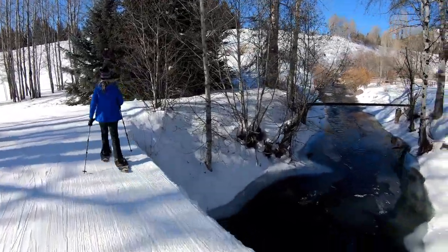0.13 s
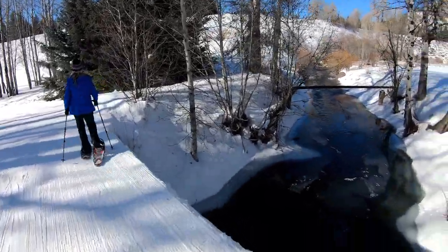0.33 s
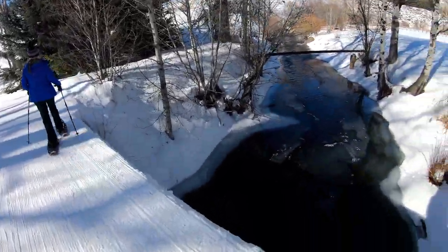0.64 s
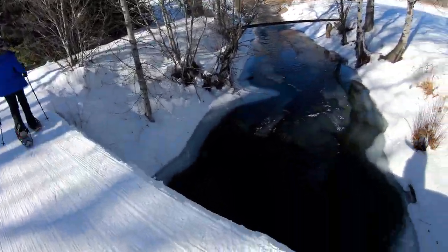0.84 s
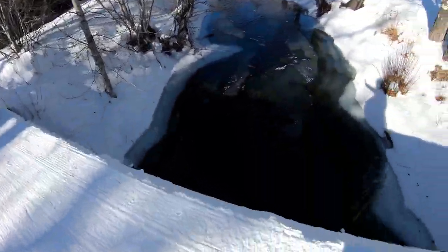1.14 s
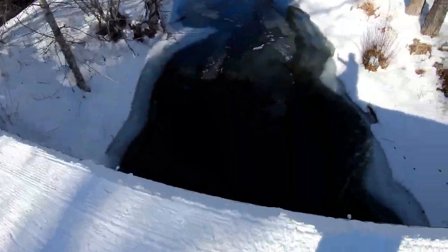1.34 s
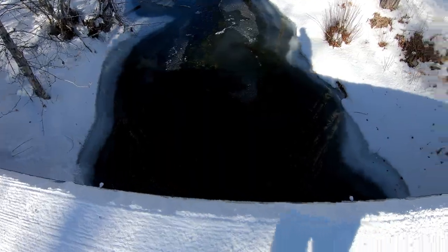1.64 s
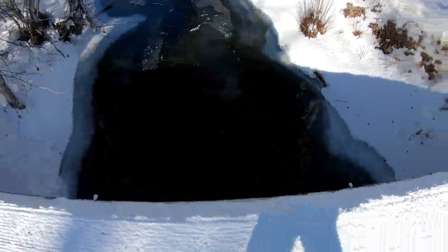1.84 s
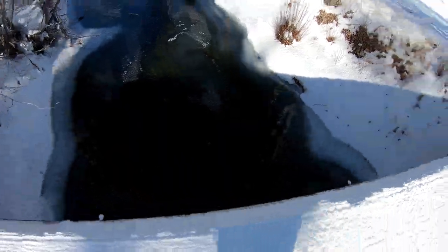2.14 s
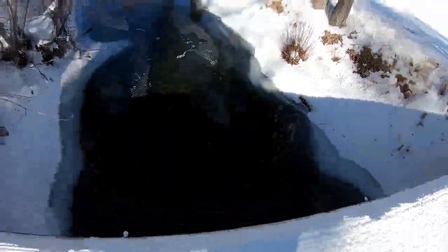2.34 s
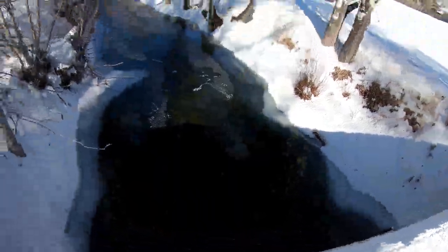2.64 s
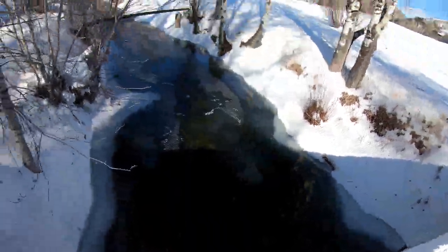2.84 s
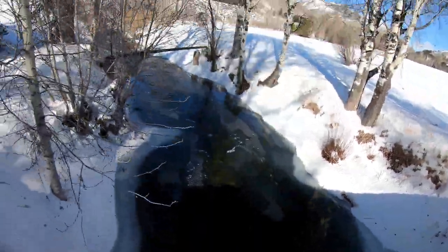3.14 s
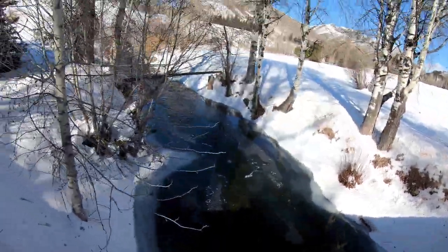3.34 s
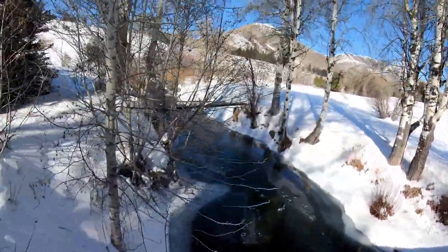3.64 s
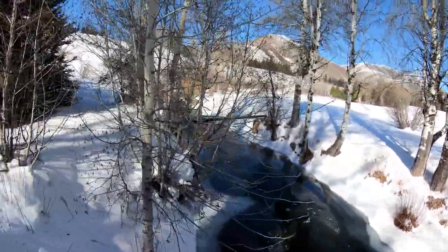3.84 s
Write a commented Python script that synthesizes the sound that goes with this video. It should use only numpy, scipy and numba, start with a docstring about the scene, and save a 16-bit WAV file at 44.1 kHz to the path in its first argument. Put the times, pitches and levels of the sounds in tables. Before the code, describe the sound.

Steady snowshoe footsteps break crisp crust in sharp cracks and grainy crushing, with sliding crystals and dull thumps. Heard close from chest height on an open winter trail, over faint hush and late low gusts.

```python
"""Snowshoes on firm snow

Snowshoe steps on firm snow, heard from a hand-held camera at chest height, a little from the right.
The crust cracks in short bursts of damped rings, and grains crush as thousands of smaller rings.
Loose crystals hiss, as shaped noise, while they slide and spray; slaps, thuds and creaks fall between.
Low noise makes gusts that rumble on the two microphone ports over a faint winter hush."""
import sys
import numpy as np
from scipy import signal
from scipy.fft import rfft, irfft
from scipy.io import wavfile
from scipy.ndimage import uniform_filter1d
from numba import njit

SR = 44100
rng = np.random.default_rng(int(sys.argv[2]) if len(sys.argv) > 2 else 0)


def transcribe(signal):
    """Save signal, clipped to [-1, 1], as a 16-bit WAV file at the path in sys.argv[1]."""
    frames = np.atleast_2d(signal).T
    limited = np.clip(frames, -1, 1)
    pcm = np.round(limited * 32767).astype(np.int16)
    wavfile.write(sys.argv[1], SR, pcm)


N = 176400  # samples, 4 s

# how strongly snow sounds at each pitch: pitch_hz [Hz], relative level_db [dB]
SNOW_COLOUR = [(90, -29.5), (170, -9), (670, -4), (1300, 4.5), (1900, 6.5), (3200, -1.5), (5000, -54)]

# a Q is the sharpness of a damped ring: it falls to 1/e in Q / pi cycles
CRACK_Q, THUD_Q, RING_Q = 2.51, 1.47, 7.7
THUD_HZ, FRACTURE_HZ = 203, 2530  # dull thump; hard, bright first fracture
RING_LAG_S = 0.00185  # the plate rings this long after the crack
SPRAY_DB, SPRAY_S = -28.5, 0.0051  # thrown crystals: level against their crack, decay time
GRAIN_SCATTER_DB, CLUMP_DB = 2, 2.5  # spread of grain levels; depth of the clumping


def undb(db):
    """Gain of a dB value."""
    return 10 ** (np.asarray(db) / 20)


def on_hz(table, hz):
    """Read (Hz, value) points on a log frequency axis."""
    points = np.array(table)
    return np.interp(np.log(np.maximum(hz, 1)), np.log(points[:, 0]), points[:, 1])


def on_time(table, column=1):
    """Read one column of rows that begin with a time in s, at every sample."""
    rows = np.array(table)
    return np.interp(np.arange(N) / SR, rows[:, 0], rows[:, column])


def at(s):
    """Sample index of a time in s."""
    return (s * SR).astype(np.int64)


def unit(x):
    """Scale to rms 1."""
    return x / np.sqrt(np.mean(x ** 2))


def noise(table):
    """Noise coloured by (Hz, dB) points, rms 1."""
    spectrum = rfft(rng.standard_normal(N))
    return unit(irfft(spectrum * undb(on_hz(table, np.fft.rfftfreq(N, 1 / SR))), N))


def walk(rate):
    """Random levels held 1 / rate s and slewed, rms 1."""
    hold = max(int(SR / rate), 2)
    levels = rng.standard_normal(4000)
    return unit(uniform_filter1d(levels[np.arange(N) // hold % len(levels)], hold // 2 + 1))


@njit
def grains(n, start, turn, q, size):
    """Each grain is a short damped ring with a soft onset; turn is its pitch in radians per sample."""
    out = np.zeros(n)
    for g in range(len(start)):
        spin = np.exp(1j * turn[g] - turn[g] / (2 * q[g]))
        fade = np.exp(-turn[g] / 2)
        z, softness = size[g] + 0j, 1.
        for i in range(max(start[g], 0), min(n, start[g] + int(12 * q[g] / turn[g]))):
            out[i] += z.imag * (1 - softness)
            z, softness = z * spin, softness * fade
    return out


def ring(s, hz, q, size):
    """Damped rings from times [s], pitches [Hz], sharpnesses and sizes."""
    turn = 2 * np.pi * np.clip(hz, 40, SR / 3) / SR
    return grains(N, at(s), turn, q + 0 * s, size)


def kicked(s, db, decay_s):
    """Sudden rises at the given times that die away exponentially."""
    kicks = np.bincount(at(s), undb(db), N)
    return signal.lfilter([1], [1, -np.exp(-1 / (decay_s * SR))], kicks)


def snowshoes(clumps):
    """Cracks and crush ring within the band of the snow; loose crystals hiss as they slide and spray."""
    # one list per step: time_s [s], relative crush_db [dB], relative slide_db [dB]
    step_rows = [
        [(.05, -54, -64.5), (.19, -49, -77), (.235, -43.5, -61), (.32, -39, -49.5), (.42, -33.5, -51),
         (.455, -45, -72), (.47, -54, -67.5)],
        [(.61, -62.5, -66), (.665, -55, -53.5), (.705, -65, -60), (.755, -40.5, -54.5), (.80, -45.5, -51),
         (.88, -37.5, -47.5), (.97, -36.5, -53.5), (.99, -48, -58), (1.07, -61, -62.5)],
        [(1.19, -58.5, -66), (1.24, -50, -55.5), (1.34, -43, -62.5), (1.355, -40.5, -45.5), (1.42, -39, -46),
         (1.46, -34.5, -46), (1.52, -44, -50), (1.54, -63, -57), (1.58, -57, -65.5)],
        [(1.72, -57.5, -65), (1.8, -47.5, -66.5), (1.83, -48, -49), (1.95, -47.5, -51), (1.99, -38.5, -48.5),
         (2.035, -35.5, -50.5), (2.08, -40.5, -48.5), (2.11, -66, -54), (2.17, -63, -62)],
        [(2.28, -66, -68), (2.32, -50.5, -60), (2.385, -52, -60), (2.4, -45, -47), (2.51, -45.5, -50),
         (2.53, -36, -43), (2.6, -32.5, -51.5), (2.62, -52, -51.5), (2.71, -61.5, -68.5)],
        [(2.83, -50.5, -68.5), (2.9, -55, -53.5), (2.93, -40.5, -51), (3.02, -45, -52), (3.04, -36.5, -53),
         (3.11, -38, -52.5), (3.13, -48.5, -59), (3.26, -64, -72.5)],
        [(3.39, -48.5, -86), (3.45, -49.5, -80), (3.47, -39.5, -54), (3.53, -46, -50.5), (3.545, -33, -47.5),
         (3.63, -35, -56.5), (3.685, -40.5, -60), (3.7, -55.5, -75)],
        [(3.83, -56, -72), (3.87, -51, -73), (3.94, -54.5, -60.5), (4.0, -35, -48.5)],
    ]
    # spectrum of the sliding hiss: freq_hz [Hz], relative level_db [dB]
    slide_colour = [(2000, -13), (3500, -15), (4600, -23), (8500, -20.5), (10100, -29), (11500, -45),
                    (14000, -46), (15500, -65)]
    rows = [row for step in step_rows for row in step]
    knocks, spray = np.sum([cracks(), snaps(), slaps()], axis=0)
    load = knocks + thuds() + creaks() + crush(rows, clumps)
    body = signal.sosfilt(signal.butter(4, (84, 7400), "band", fs=SR, output="sos"), load)

    flicker_db = 3 * (0.49 * clumps + walk(300))
    slide = undb(on_time(rows, column=2) + 9.5 + flicker_db)

    # the hollow under the crust hums after every load
    hollow_hz, hollow_width_hz, hollow_db = 168.7, 33.5, -0.5
    peak = signal.iirpeak(hollow_hz, hollow_hz / hollow_width_hz, SR)
    hollow = signal.lfilter(*peak, body) * undb(hollow_db)
    return body + hollow + noise(slide_colour) * (slide + spray)


def cracks(count=16):
    """A crack is a burst of fractures that sinks in pitch, a ring of the plate and a spray of crystals."""
    # cracks of the crust: start_s [s], relative level_db [dB], plate pitch_hz [Hz]
    crust_cracks = [(.105, -15.5, 720), (.128, -9.5, 705), (.159, -13.5, 900), (.194, -21, 765),
                    (.199, -10, 910), (0.214, -13.5, 820), (.241, -15, 310), (.335, -18, 720),
                    (.756, -12.5, 614), (.769, -12, 313), (.888, -11.5, 336), (.995, -15, 610),
                    (1.231, -11.5, 370), (1.247, -15, 660), (1.303, -14, 312), (1.33, -10, 605),
                    (1.818, -10, 255), (1.844, -11.5, 310), (1.921, -12, 1880), (2.003, -11.5, 715),
                    (2.295, -20, 470), (2.396, -11.5, 322), (2.915, -14, 380), (3.031, -14, 312),
                    (3.456, -9.5, 1200), (3.937, -17, 360)]
    burst_s, spread_oct, sag_oct, burst_db = 0.01, 1.11, 1, -9
    s, db, hz = np.array(crust_cracks).T[:, :, None]
    u, g = rng.random((len(s), count)), rng.standard_normal((len(s), 2, count))
    late = u ** 1.815  # place in the burst, 0-1, crowded at the start
    late[:, 0] = 0
    # fractures centre midway, in octaves, between the plate's pitch and 1100 Hz
    pitch = np.sqrt(hz * 1100) * 2 ** (spread_oct * g[:, 0] + sag_oct * (.5 - late))
    size = undb(-8 * late + on_hz(SNOW_COLOUR, pitch)) * np.sign(g[:, 1])
    # even out the strength of the bursts, low fractures counting more as they ring longer
    strength = np.sqrt(np.mean(size ** 2 * 1000 / pitch, axis=1, keepdims=True))
    size = size * undb(db + burst_db) / strength
    burst = ring((s + burst_s * late).ravel(), pitch.ravel(), CRACK_Q, size.ravel())

    s, db, hz = s[:, 0], db[:, 0], hz[:, 0]
    spray = kicked(s, db + SPRAY_DB, SPRAY_S)
    plate = ring(s + RING_LAG_S, hz, RING_Q, undb(db - 12.5))
    first = ring(s, FRACTURE_HZ * 2 ** (g[:, 1, 1] / 4), CRACK_Q / 2, undb(db - 8.5))
    return first + burst + plate, spray


def crush(rows, clumps, count=18000):
    """Under the load snow grains break in clumps, at random pitches and strengths, with squeaks among them."""
    grain_q, colour_oct, colours_per_s = 2.4, 0.33, 40
    u = rng.random((count, 4)).T
    s = u[0] * N / SR
    hz = 90 + 5500 * u[1] ** 1.566
    scatter_db = -GRAIN_SCATTER_DB * np.log(u[2] + 0.0017)
    db = on_hz(SNOW_COLOUR, hz) + 10 * np.log10(hz ** 0.33) + scatter_db
    # neighbouring grains drift in pitch together
    hz = hz * 2 ** (colour_oct * walk(colours_per_s)[at(s)])
    breaking = ring(s, hz, grain_q * (.5 + u[3]), undb(db + CLUMP_DB * clumps[at(s)]))
    return (squeaks(clumps) + unit(breaking)) * undb(on_time(rows) + 5)


def squeaks(clumps, count=900):
    """Now and then packed grains slip and ring a little longer."""
    centre_hz, spread_oct, squeak_q = 1004, 0.94, 8.8
    u, g = rng.random((count, 2)).T, rng.standard_normal(count)
    scatter_db = -GRAIN_SCATTER_DB * np.log(u[1] + 0.048)
    size = undb(scatter_db + CLUMP_DB * clumps[(u[0] * N).astype(int)])
    slips = ring(u[0] * N / SR, centre_hz * 2 ** (spread_oct * g), squeak_q, size)
    return unit(slips) * undb(-6)


def clumping():
    """Clumps of grains give way suddenly and settle; a log level of mean 0 and rms 1."""
    clumps_per_s, settle_s = 130, 0.0053
    u = rng.random((clumps_per_s * N // SR, 2)).T
    kick_db = -6.0 * np.log(u[1] + 0.082)
    level = np.log(kicked(u[0] * N / SR, kick_db, settle_s) + 0.7)
    return unit(level - level.mean())


def slaps(count=40):
    """The shoe's tail slaps down as the foot lifts: a dry rattle, densest first, a thud and flying crystals."""
    # slaps of the tail: start_s [s], relative level_db [dB]
    tail_slaps = [(.444, -29), (.493, -22.5), (1.032, -22.5), (1.556, -18.5), (2.137, -20), (2.625, -20.5),
                  (2.68, -20.5), (3.221, -23.5), (3.667, -33), (3.845, -24)]
    slap_s, rattle_hz, spread_oct, spray_db, thud_db = 0.011, 1000, 1.22, -37.5, -3.5
    s, db = np.array(tail_slaps).T[:, :, None]
    when = s + slap_s * rng.random((len(s), count)) ** 1.5
    g = rng.standard_normal((len(s), 2, count))
    pitch = rattle_hz * 2 ** (spread_oct * np.clip(g[:, 0], -1, 2))
    # the first fracture is bright and 3.9 times the rms size of the rest
    when[:, 0], pitch[:, 0], g[:, 1, 0] = s[:, 0], FRACTURE_HZ, 3.9
    rattle = ring(when.ravel(), pitch.ravel(), CRACK_Q, (undb(db) * g[:, 1] / 2).ravel())
    thud = ring(s[:, 0] + slap_s / 2, THUD_HZ + 0 * s[:, 0], THUD_Q, undb(db[:, 0] + thud_db))
    spray = kicked(when.ravel(), (db + spray_db + 0 * when).ravel(), SPRAY_S / 2)
    return rattle + thud, spray


def snaps():
    """A hard snap of the crust: one short clean ring, a lower after-knock and a pinch of crystals."""
    # single snaps: start_s [s], relative level_db [dB], centre pitch_hz [Hz]
    crust_snaps = [(0.1579, -6.5, 2160), (.72, -26, 2600), (1.21, -23, 3000), (1.274, -10, 1310),
                   (1.327, -10.5, 1690), (1.966, -14.5, 1920), (2.321, -32, 2800), (2.361, -8, 1210),
                   (2.384, -17.5, 2880), (2.775, -18.5, 760), (2.798, -22.5, 2580), (3.367, -6, 1280),
                   (3.625, -10, 1820), (3.772, -31, 2160), (3.96, -12, 1580)]
    snap_q = 3.2
    s, db, hz = np.array(crust_snaps).T
    bend = 1 + 0.092 * rng.standard_normal(len(s))
    knock = ring(s + 2 * RING_LAG_S, hz / 2, snap_q, undb(db - 11.5))
    return ring(s, hz * bend, snap_q, undb(db)) + knock, kicked(s, db + SPRAY_DB, SPRAY_S / 2)


def thuds():
    """The shoe lands or settles heavily: a dull, quickly damped thump."""
    # landings: start_s [s], relative level_db [dB]
    landings = [(.759, -20), (0.892, -24), (.998, -26), (1.333, -16), (1.821, -16.5), (1.848, -11.5),
                (2.3, -24), (2.399, -13.5), (2.917, -17), (3.033, -21), (3.969, -10.5)]
    s, db = np.array(landings).T
    bend_oct = 0.085 * rng.standard_normal(len(s))
    return ring(s, THUD_HZ * 2 ** bend_oct, THUD_Q, undb(db))


def creaks(count=8):
    """Packed snow slips under the frame in a quick run of rings at nearly one pitch."""
    # creaks: start_s [s], length_s [s], nominal pitch_hz [Hz], relative level_db [dB]
    frame_creaks = [(0.651, .04, 2770, -26), (1.248, 0.00806, 730, -20.5), (2.052, 0.014, 1240, -23),
                    (2.07, 0.013, 1660, -19.5)]
    s, length, hz, db = np.array(frame_creaks).T[:, :, None]
    u = rng.random((len(s), 2, count))
    slips = s + length * (np.arange(count) + u[:, 0]) / count
    pitch = hz * (0.917 + 0.12 * u[:, 1])
    return ring(slips.ravel(), pitch.ravel(), RING_Q, (undb(db) + 0 * slips).ravel())


def wind():
    """Gusts rumble on each port by themselves: separate low noises under one gust curve."""
    # strength of the gusts: time_s [s], relative level_db [dB]
    gust_levels = [(0.0, -67), (0.51, -62), (0.66, -87), (0.76, -80), (1.11, -77), (1.36, -57), (1.74, -84),
                   (1.84, -71), (2.28, -60), (2.36, -44.5), (3.6, -49), (3.7, -37.5), (4.0, -39)]
    # spectrum of the rumble: freq_hz [Hz], relative level_db [dB]
    rumble_colour = [(20, -7.5), (75, 0), (177, -8), (308, -26), (1100, -120)]
    gust_db = on_time(gust_levels) + 6.5
    return np.array([noise(rumble_colour) * undb(gust_db + 2.5 * walk(12)) for _ in range(2)])


def hush(swell):
    """The faint winter hush is steady coloured noise that swells a little."""
    # spectrum of the hush: freq_hz [Hz], relative level_db [dB]
    hush_colour = [(60, -38), (150, -9.5), (900, -7), (2800, -35), (4200, -24), (9500, -12), (12000, -28.5),
                   (15500, -48)]
    return noise(hush_colour) * undb(-55.5 + 3.4 * swell)


def ports(right, scattered):
    """The camera body shades the left port in the mids; part of its sound comes by another path."""
    # left port against right: freq_hz [Hz], left_minus_right_db [dB]
    port_balance = [(200, -0.5), (380, -1), (700, -4.5), (1200, -11), (2380, -10.5), (4400, -3.5),
                    (15000, -5)]
    # share of sound common to both ports: freq_hz [Hz], likeness [0-1]
    port_likeness = [(290, 1), (640, 0.84), (1400, 0.67), (3100, 0.64), (6800, 0.34)]
    left_lag_s = 4.5e-5
    hz = np.fft.rfftfreq(2 * N, 1 / SR)
    # a mirrored copy keeps the ends from wrapping round
    near, far = (rfft(np.r_[x, x[::-1]]) for x in (right, scattered))
    alike = np.clip(on_hz(port_likeness, hz), 0, 1)
    delayed = np.exp(-2j * np.pi * hz * left_lag_s) * near
    left = alike * delayed + np.sqrt(1 - alike ** 2) * far
    return np.array([irfft(left * undb(on_hz(port_balance, hz)))[:N], right])


def scene():
    """Steps and hush, drawn once for each path, go through the ports; wind comes on top."""
    clumps, swell = clumping(), walk(27)
    paths = [undb(6.0) * snowshoes(clumps) + hush(swell) for _ in range(2)]
    return ports(*paths) + wind()


def record(dry):
    """The camera cuts the top steeply above 15650 Hz."""
    return signal.sosfilt(signal.ellip(10, .2, 80, 15650, fs=SR, output="sos"), dry)


dry = scene()
out = record(dry)
transcribe(out)
```